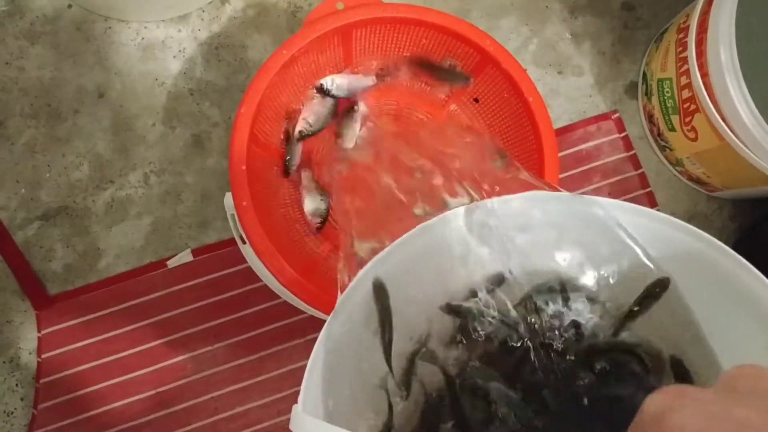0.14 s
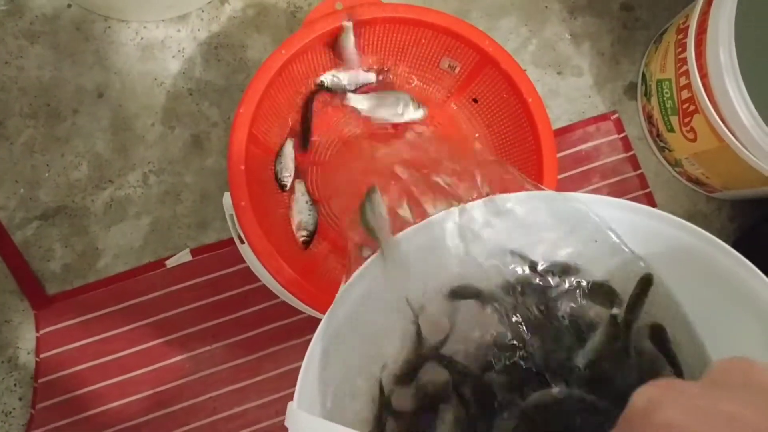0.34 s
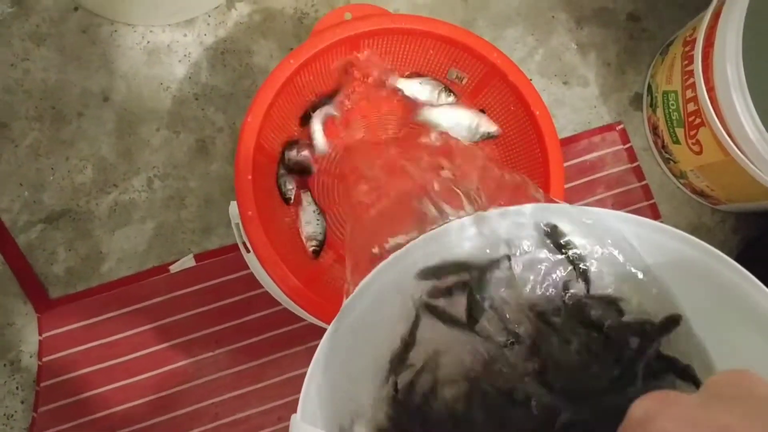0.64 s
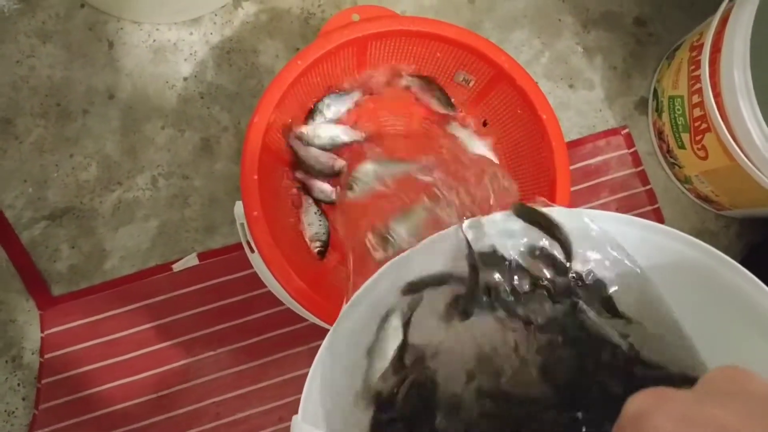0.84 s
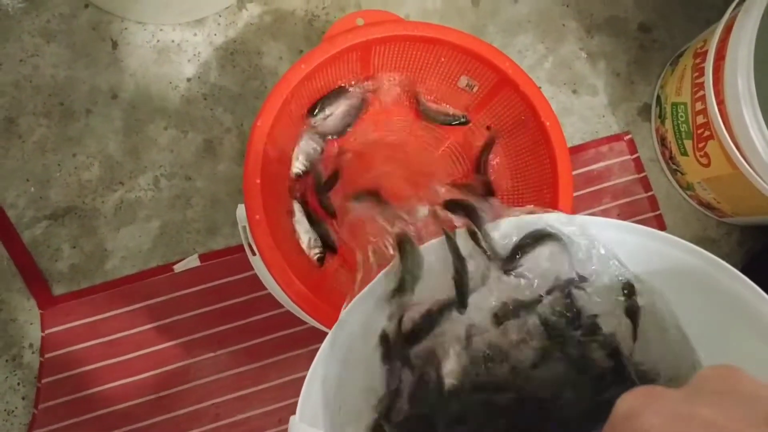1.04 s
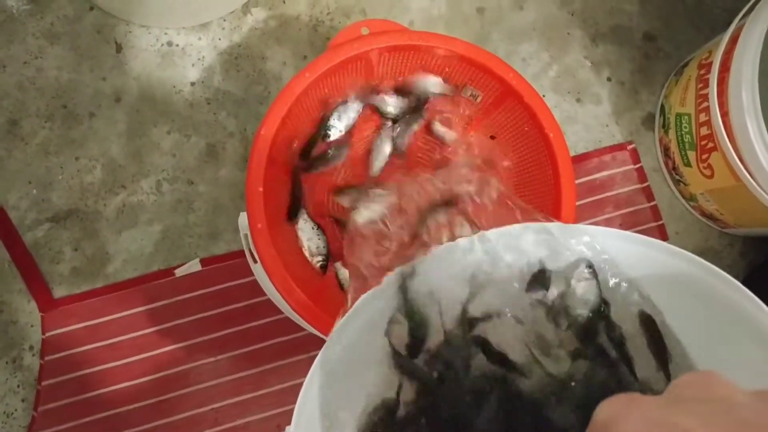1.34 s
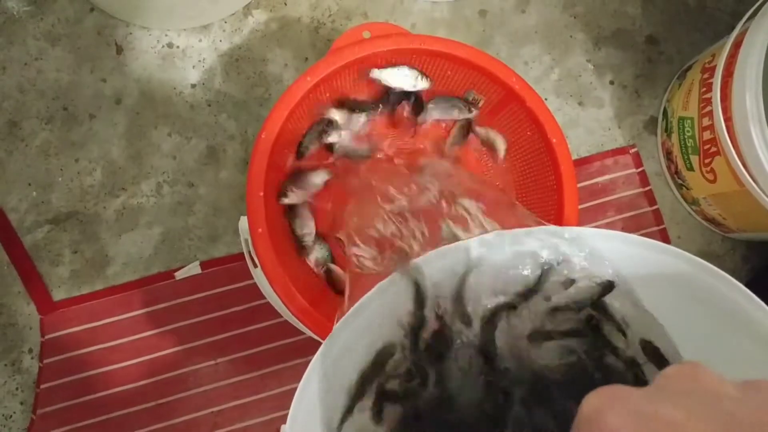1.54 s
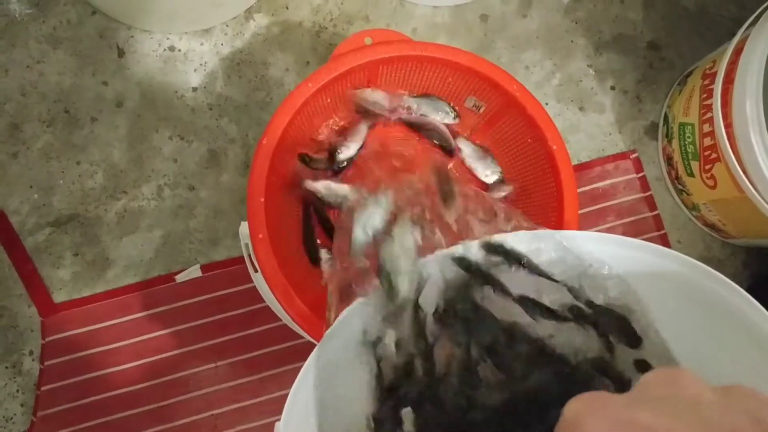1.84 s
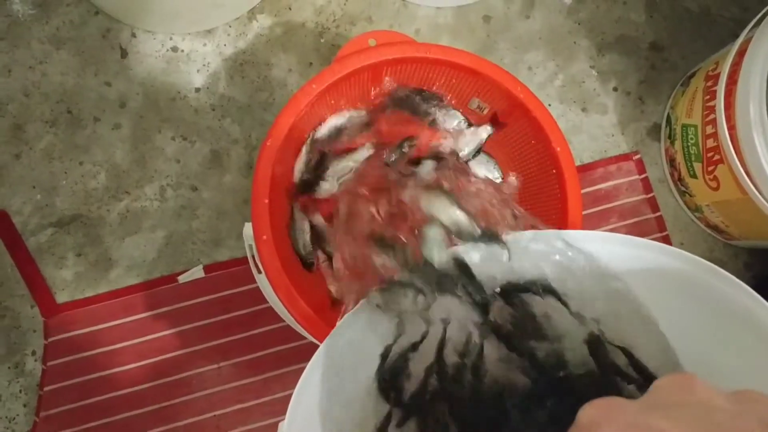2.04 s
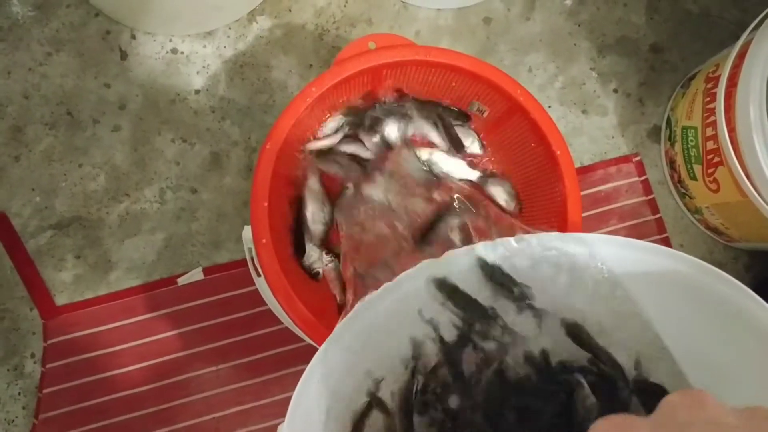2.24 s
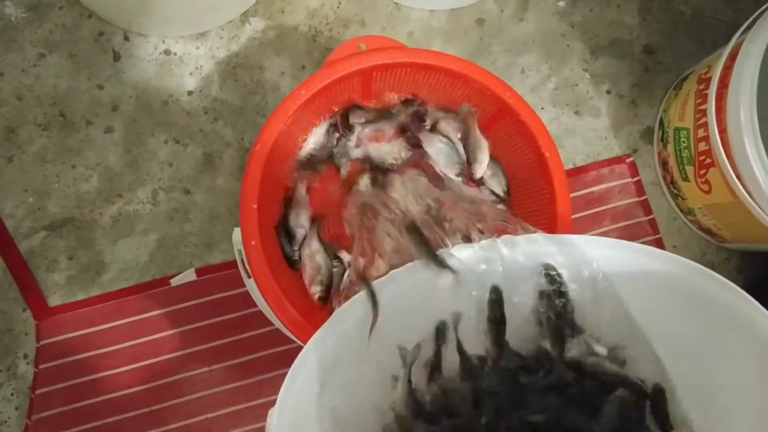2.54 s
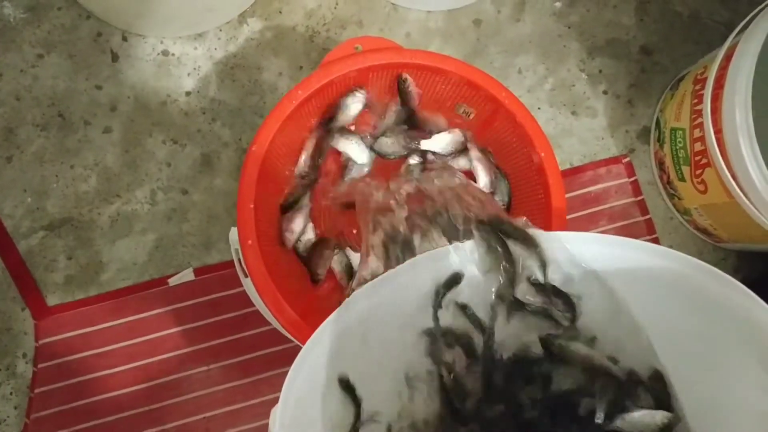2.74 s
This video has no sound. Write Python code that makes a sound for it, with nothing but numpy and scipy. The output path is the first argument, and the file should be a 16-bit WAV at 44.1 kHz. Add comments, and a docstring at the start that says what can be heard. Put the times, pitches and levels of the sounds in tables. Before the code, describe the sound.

Close, continuous pouring of water with fish into a mesh-covered bucket, with hollow drumming and bright spray

```python
"""A small hard room, close to a camera's microphone: water and small fish pour from a plastic bucket through
a colander into a second bucket. Noise rung by resonances makes the lower bucket drum under the stream, and
wavering tones swell as it booms under each heavy slug. Coloured noise and damped, gliding bubble tones make
the gurgle, slosh, splash and spray; single bubbles and small knots of them spit, noise bursts are fish
slapping the mesh, fluttering tones glug, and a faint low rumble lies underneath."""
import sys
import numpy as np
from scipy import signal
from scipy.fft import rfft, irfft, next_fast_len
from scipy.io import wavfile
from scipy.ndimage import uniform_filter1d, map_coordinates

SR = 44100
rng = np.random.default_rng(int(sys.argv[2]) if len(sys.argv) > 2 else 0)


def dump(signal):
    """Clip the signal to [-1, 1] and save it as 16-bit WAV at the path in sys.argv[1]."""
    limited = np.clip(np.atleast_2d(signal).T, -1, 1)
    pcm = np.round(limited * 32767).astype(np.int16)
    wavfile.write(sys.argv[1], SR, pcm)


N = 127890


def amp(db):
    """Decibels to amplitude."""
    return 10 ** (np.asarray(db) / 20)


def unit(x):
    """Scale to an rms of one."""
    return x / np.sqrt(np.mean(x ** 2) + 1e-20)


def along(points, hz):
    """Read a curve of (f/Hz, value) points on a log frequency axis."""
    f, value = np.transpose(points)
    return np.interp(np.log(hz + 1), np.log(f + 1), value)


def curves(rows):
    """One value per sample for each column after the time."""
    s, *columns = np.transpose(rows)
    return [np.interp(np.arange(N) / SR, s, column) for column in columns]


def wobble(rate):
    """A smooth random curve, rate knots a second, at most 60."""
    knots = rng.standard_normal(int(N * 60 / SR) + 4)
    return map_coordinates(knots, [np.arange(N) * min(rate, 60) / SR])


def filtered(x, response):
    """Multiply the spectrum of x by a complex response of frequency."""
    m = next_fast_len(N + SR // 2)
    return irfft(rfft(x, m) * response(np.fft.rfftfreq(m, 1 / SR)), m)[..., :N]


def coloured(x, spectrum):
    """Weight x by (f/Hz, relative level/dB) points."""
    return filtered(x, lambda hz: amp(along(spectrum, hz)))


def modes(table):
    """Causal response of damped resonances, neighbours of opposite sign."""
    def response(f):
        total = 0
        for k, (centre, width, db) in enumerate(table):
            total = total + (-1) ** k * amp(db) * 1j * f * width / (centre ** 2 - f ** 2 + 1j * f * width)
        return total
    return response


# How alike the two channels are: f/Hz, left-right correlation
CHANNEL_LIKENESS = [(30, .88), (100, 0.66), (200, 1), (400, 0.59), (700, 0.41), (1500, 0.22),
                    (4000, 0.0056)]


def pair(x):
    """Mix two unrelated signals to left and right, with a likeness that depends on frequency."""
    def mid_and_side(hz):
        turn = np.arccos(np.clip(along(CHANNEL_LIKENESS, hz), -1, 1)) / 2
        return np.array([np.cos(turn), np.sin(turn)])
    mid, side = filtered(x, mid_and_side)
    return np.array([mid + side, mid - side])


def rush(patchy_db):
    """Two turbulent noises with small and large patches of random gain in time and frequency."""
    z = signal.stft(rng.standard_normal((2, N)), nperseg=256)[2]

    def patches(high, long):
        grid = uniform_filter1d(rng.standard_normal(z.shape[1:]), high, 0)
        return unit(uniform_filter1d(grid, long, 1))

    gain = amp(patchy_db * (patches(5, 4) + patches(10, 20)))
    return unit(signal.istft(z * gain, nperseg=256)[1][:, :N])


def bubbles(s, hz, life_s, size, rise, length=400):
    """Bubbles ring as damped sines that glide upward, summed at their times."""
    t = np.arange(length) / SR
    u = t / life_s[:, None]
    envelope = size[:, None] * np.exp(-u) * (1 - np.exp(-8 * u))
    wave = envelope * np.sin(2 * np.pi * hz[:, None] * t * (1 + rise * u))
    at = (np.clip(s, 0, N / SR) * SR).astype(int)[:, None] + np.arange(length)
    return np.bincount(at.ravel(), wave.ravel(), N + length + 1)[:N]


def fizz(count, mid_hz, spread, cycles, size_db, size=300):
    """Random bubbles in clumps, a separate crowd on each side; size is the samples kept of each."""
    out, density = [], np.cumsum(amp(4.5 * wobble(40) + 2.5 * wobble(10)))
    for r in rng.random((2, 4, count)):
        s = np.interp(r[0] * density[-1], density, np.arange(N) / SR)
        hz = np.clip(mid_hz * np.exp(spread * 2 * (r[1] + r[2] - 1)), 200, SR / 3)
        loudness = amp(-size_db * np.log(r[3] + 0.0061))  # few loud, many faint
        out.append(bubbles(s, hz, cycles / hz, loudness, rise=0.053, length=size))
    return unit(np.array(out))


def layer(db, spectrum, grains, share, patchy_db):
    """Noise and bubbles under one colour and one level; share is the bubbles' part of the power."""
    share = np.clip(share, 0, 1)
    noise, grains = coloured(np.array([rush(patchy_db), grains]), spectrum)
    return amp(db) * (np.sqrt(1 - share) * unit(noise) + np.sqrt(share) * unit(grains))


# Steady drumming of the bucket, before offsets: t/s, level/dB
DRUM_LEVEL = [(0, -16.5), (.15, -25), (.4, -23), (.6, -24), (.9, -23), (1.25, -22), (1.6, -24),
              (2.05, -24.5), (2.3, -27), (2.6, -27), (2.8, -27), (2.9, -25.5)]
# Air and floor of the bucket: f/Hz, width/Hz, relative level/dB
BUCKET_MODES = [(177, 7.9, -8), (208, 15, -4.5), (224.8, 15.3, -2), (262.4, 11.4, -0.5), (297.6, 7.5, -1),
                (345, 19, -8), (388, 22, -13), (437.5, 17, -15)]


def drumming():
    """The stream drums steadily: noise rings the air and floor of the bucket."""
    level_db, = curves(DRUM_LEVEL)
    return amp(level_db - 1.5) * unit(filtered(rng.standard_normal((2, N)), modes(BUCKET_MODES)))


# Walls of the bucket: f/Hz, width/Hz, relative level/dB
WALL_MODES = [(510.4, 32, 2), (572.3, 24, 8), (622.4, 8.2, 9), (660, 13, 3), (721, 31, 7), (779, 54, 4.5),
              (817, 59, 6), (940, 65, 3), (1074, 54, -3), (1330, 45, -9)]
# Colour of the gurgle: f/Hz, relative level/dB
GURGLE_COLOUR = [(240, -54), (400, -15), (480, -3.5), (580, -2.5), (850, -1), (1200, -5), (1600, -4),
                 (2600, -33)]


def gurgle(level_db, surge):
    """Water gurgles in the bucket's walls: ringing noise and low bubbles."""
    low_bubbles = fizz(count=600, mid_hz=821, spread=0.3, cycles=5.3, size_db=4.0, size=600)
    ringing = unit(filtered(rush(patchy_db=-0.13), modes(WALL_MODES))) + 0.43 * low_bubbles
    db = level_db - 1.3 + 0.56 * surge + 0.53 * wobble(4.54)
    return layer(db, GURGLE_COLOUR, ringing, share=0.64, patchy_db=2.1)


# Colour of the slosh: f/Hz, relative level/dB
SLOSH_COLOUR = [(800, -42), (1200, -7), (1700, -2.5), (2400, -0.5), (3200, 2), (3800, -3), (5000, -49)]


def slosh(level_db, surge):
    """Mid-pitched rushing noise, with about a tenth of its power in short-lived bubbles."""
    grains = fizz(count=2500, mid_hz=2070, spread=0.48, cycles=1.5, size_db=3.5, size=250)
    return layer(level_db + 0.35 * surge, SLOSH_COLOUR, grains, share=0.095, patchy_db=1.33)


# Colour of the splash: f/Hz, relative level/dB
SPLASH_COLOUR = [(2500, -84), (3300, -4), (4100, 3), (5500, 1.5), (6500, -1.5), (7500, -9), (10000, -28)]


def splash(level_db, surge):
    """Bright patchy noise with small ringing bubbles."""
    grains = fizz(count=2500, mid_hz=5424, spread=0.405, cycles=8.65, size_db=2.5)
    return layer(level_db + 0.17 * surge, SPLASH_COLOUR, grains, share=0.27, patchy_db=1.3)


# Colour of the spray: f/Hz, relative level/dB
SPRAY_COLOUR = [(4500, -54), (6000, -6), (7200, -1), (11000, -3.5), (14000, -5.5), (15400, -9.5),
                (16200, -13)]


def spray(level_db, surge):
    """The mesh breaks the stream into a fizz: treble noise and the tiniest bubbles."""
    grains = fizz(count=3500, mid_hz=9240, spread=0.45, cycles=6.7, size_db=4.0, size=160)
    return layer(level_db + 0.76 + 0.17 * surge, SPRAY_COLOUR, grains, share=0.16, patchy_db=1.46)


# Course of the pour, before offsets: t/s, gurgle level/dB, slosh level/dB, splash level/dB, spray level/dB
POUR_LEVELS = [(0.0, -24.5, -28, -29.5, -26), (0.06, -30, -28.5, -26.5, -24),
               (0.14, -22, -28.5, -25, -25.5), (0.17, -30, -28, -23, -17), (0.21, -27.5, -29, -25, -24),
               (0.52, -30.5, -29.5, -25.5, -24.5), (0.77, -29.5, -28.5, -24, -23),
               (0.78, -30.5, -31, -27, -26.5), (0.84, -30.5, -26, -24, -22.5),
               (0.94, -25.5, -31, -26.5, -23.5), (0.99, -29, -28.5, -23.5, -22.5),
               (1.15, -29.5, -27.5, -25, -23.5), (1.2, -29.5, -30.5, -26, -23.5),
               (1.47, -31.5, -29.5, -24.5, -23), (1.54, -26, -29, -26.5, -23.5),
               (1.57, -33, -25, -20, -20.5), (1.58, -29, -27.5, -25, -23.5), (1.93, -29, -28, -24.5, -23.5),
               (2.01, -27.5, -26, -23, -20), (2.24, -30, -25.5, -24.5, -23), (2.26, -30, -25, -24, -20.5),
               (2.3, -28, -27, -23, -22), (2.41, -30, -24.5, -24, -23), (2.53, -31.5, -30.5, -26.5, -27),
               (2.61, -32, -29.5, -29, -25.5), (2.64, -33.5, -27, -20.5, -21.5),
               (2.71, -28.5, -30, -29.5, -29.5), (2.77, -28, -29.5, -24.5, -23), (2.85, -31, -30, -29, -25),
               (2.9, -34.5, -30, -24, -25)]


def stream():
    """The steady pour: drumming under four wet layers that share one random surge."""
    gurgle_db, slosh_db, splash_db, spray_db = curves(POUR_LEVELS)
    surge = wobble(8.32)
    wet = gurgle(gurgle_db, surge) + slosh(slosh_db, surge)
    wet = wet + splash(splash_db, surge) + spray(spray_db, surge)
    return pair(drumming() + amp(2.7) * wet)


def swell(s, db, rise, fall):
    """A bell-shaped gain, 6 dB down one rise before and one fall after its peak."""
    t = np.arange(N) / SR - s
    rise, fall = np.clip([rise, fall], .007, .03)  # seconds
    return amp(db - 6 * (t / np.where(t < 0, rise, fall)) ** 2)


# Surges that make the bucket boom: peak t/s, level/dB, f/Hz, rise over the last 6 dB/s, fall by 6 dB/s
# (rise and fall are times in seconds, which swell() limits)
BOOM_SURGES = [(0.091, -16.2, 246, 0.022, 0.023), (0.123, -16.6, 337, 0.006, 0.018),
               (0.135, -6.2, 241, 0.012, 0.014), (0.163, -11.7, 254, 0.011, 0.011),
               (0.181, -16.9, 320, 0.007, 0.005), (0.19, -23, 372, 0.012, 0.015),
               (0.203, -4.3, 239, 0.017, 0.014), (0.274, -11.1, 244, 0.016, 0.014),
               (0.317, -14.3, 249, 0.013, 0.014), (0.355, -13.1, 242, 0.013, 0.033),
               (0.433, -13.6, 254, 0.013, 0.02), (0.471, -9.6, 242, 0.011, 0.01),
               (0.538, -19, 345, 0.01, 0.012), (0.548, -7.4, 248, 0.024, 0.014),
               (0.574, -13.0, 262, 0.009, 0.009), (0.589, -14.6, 303, 0.011, 0.005),
               (0.592, -23, 378, 0.01, 0.012), (0.604, -10.0, 254, 0.014, 0.027),
               (0.646, -14.1, 260, 0.012, 0.01), (0.67, -8.1, 253, 0.011, 0.014),
               (0.694, -18.5, 312, 0.005, 0.006), (0.736, -10.0, 255, 0.029, 0.02),
               (0.801, -14.1, 258, 0.031, 0.03), (1.006, -16.7, 239, 0.009, 0.009),
               (1.033, -19.0, 292, 0.008, 0.021), (1.037, -16.8, 245, 0.01, 0.02),
               (1.069, -16.0, 249, 0.041, 0.032), (1.095, -18.9, 301, 0.007, 0.008),
               (1.11, -14.8, 247, 0.053, 0.036), (1.138, -16.8, 256, 0.018, 0.011),
               (1.209, -10.8, 319, 0.007, 0.006), (1.212, -17, 365, 0.007, 0.015),
               (1.227, -7.6, 235, 0.019, 0.01), (1.251, -14.3, 300, 0.005, 0.006),
               (1.27, -20, 350, 0.012, 0.012), (1.283, -10.8, 243, 0.012, 0.027),
               (1.29, -14.5, 319, 0.008, 0.009), (1.305, -20, 380, 0.014, 0.018),
               (1.332, -17.7, 295, 0.006, 0.021), (1.355, -16.3, 238, 0.008, 0.011),
               (1.406, -16.9, 252, 0.017, 0.019), (1.443, -17.2, 301, 0.008, 0.008),
               (1.47, -10.9, 246, 0.025, 0.013), (1.526, -14.1, 253, 0.013, 0.01),
               (1.553, -17.3, 244, 0.011, 0.025), (1.659, -15.6, 244, 0.016, 0.029),
               (1.712, -15.9, 244, 0.01, 0.032), (1.834, -14.5, 256, 0.022, 0.021),
               (1.867, -13.5, 247, 0.045, 0.026), (1.914, -15.5, 248, 0.012, 0.01),
               (1.946, -14.6, 248, 0.016, 0.02), (2.02, -14.0, 235, 0.04, 0.013),
               (2.032, -12.7, 302, 0.01, 0.041), (2.047, -9.7, 235, 0.011, 0.011),
               (2.099, -17.0, 234, 0.011, 0.008), (2.106, -13.9, 301, 0.033, 0.007),
               (2.155, -16.2, 303, 0.008, 0.024), (2.16, -12.2, 239, 0.018, 0.014),
               (2.231, -19.1, 294, 0.029, 0.01), (2.308, -19, 232, 0.01, 0.012),
               (2.312, -21, 298, 0.012, 0.012), (2.34, -27, 362, 0.015, 0.02),
               (2.39, -21, 236, 0.014, 0.014), (2.469, -17.8, 235, 0.012, 0.018),
               (2.556, -15.8, 234, 0.01, 0.012), (2.64, -21, 285, 0.015, 0.015),
               (2.772, -19, 246, 0.01, 0.01), (2.786, -18.6, 313, 0.008, 0.008),
               (2.822, -18.5, 300, 0.018, 0.025), (2.83, -21, 240, 0.015, 0.02)]
# Pitch borders between the three booming modes: f/Hz
BOOM_BORDERS = [275, 330]
SUSTAIN_DB = (-3.5, -16, -19)  # ringing of each mode between surges, over the drumming curve
WANDER_RAD = 0.52  # slow random drift of phase


def boom():
    """Three modes of the bucket keep ringing; each surge feeds one of them and bends its pitch."""
    out, (drum_db,) = 0, curves(DRUM_LEVEL)
    for mode, sustain_db in enumerate(SUSTAIN_DB):
        rows = [row for row in BOOM_SURGES if np.searchsorted(BOOM_BORDERS, row[2]) == mode]
        hz, = curves([(s, pitch) for s, db, pitch, rise, fall in rows])
        power = amp(drum_db + sustain_db) ** 2
        for s, db, pitch, rise, fall in rows:
            power = power + swell(s, db, rise, fall) ** 2
        cycles = np.cumsum(hz) / SR + rng.random()
        out = out + np.sqrt(power) * np.sin(2 * np.pi * cycles + WANDER_RAD * wobble(25.08))
    return out


# Colour of the low rumble: f/Hz, relative level/dB
RUMBLE_COLOUR = [(15, -8), (25, 1), (60, 0.5), (110, 7), (150, 15.5), (170, -13), (250, -60)]
RUMBLE_DB, FADE_DB_PER_S = -53.5, 2.5  # level at the start before its swings, steady fade
FOLLOW_SHARE = 0.62  # share of the scene's level swings, in dB, that the rumble follows


def rumble(heard):
    """A faint uneven low noise that eases off and swings with the loudness of everything else."""
    power = np.abs(uniform_filter1d(np.mean(heard, axis=0) ** 2, size=900))
    level = amp(RUMBLE_DB - FADE_DB_PER_S * np.arange(N) / SR + 1.9 * wobble(10.6))
    level = level * (power / power.mean()) ** (FOLLOW_SHARE / 2)
    return level * unit(pair(coloured(rng.standard_normal((2, N)), RUMBLE_COLOUR)))


# Spits at the mesh: t/s, relative level/dB, f/Hz, length/s, left over right level/dB before the final lean
SPIT_EVENTS = [(0.11, -8, 4350, 0.0025, -5.0), (0.1775, -14, 4020, 0.003, -2.5),
               (0.615, -8, 3400, 0.0025, -1), (0.677, -10.5, 3500, 0.013, -1),
               (0.817, -11, 3100, 0.0022, -4.0), (0.828, -8, 4200, 0.0027, -7),
               (0.862, -5, 5100, 0.0018, -16), (0.9787, -10, 6280, 0.0025, -3.5),
               (1, -2, 4840, 0.00252, -4.0), (1.053, -9.5, 3630, 0.0075, -8),
               (1.257, -11, 4050, 0.0018, -8), (1.381, -5, 3860, 0.0025, -2),
               (1.472, -2, 6050, 0.0017, -3.5), (1.5604, -8, 5420, 0.0025, -6),
               (1.5614, -3, 4100, 0.0022, -3.5), (1.77, -1, 5800, 0.0025, -2),
               (1.8517, -5, 4490, 0.0025, -1), (2.0278, -3, 5640, 0.0025, -5),
               (2.108, -11, 2900, 0.0019, -3.5), (2.376, -6, 4080, 0.0025, -7),
               (2.62, -18, 4860, 0.0025, -3.5), (2.642, -6.5, 4870, 0.016, 3),
               (2.737, -6, 4740, 0.0031, -10), (2.7666, -5, 5240, 0.0025, -5),
               (2.784, 3.5, 5320, 0.00184, -1), (2.746, -11, 4200, 0.0015, -3), (1.07, -9, 4200, 0.003, -3),
               (1.144, -11, 3460, 0.0066, -3), (1.266, -2.5, 5360, 0.003, -2), (2.666, -13, 5160, 0.016, 4),
               (2.633, -19, 3280, 0.015, 5), (2.642, -10, 7200, 0.0099, 1), (0.172, -10.5, 7370, 0.01, -15),
               (0.0473, -14, 7700, 0.0015, -2.5), (0.1521, -10, 12100, 0.0015, -3),
               (0.168, -8, 9000, 0.015, -1.0), (1.2575, -9, 6870, 0.0016, 2),
               (1.5903, 4, 9650, 0.0015, -1.0), (1.7923, -15, 9100, 0.0015, 1),
               (1.8507, 1, 7900, 0.0013, -10), (1.9999, 8, 10700, 0.0016, 3),
               (2.0817, -18, 7600, 0.0015, -0.5), (2.255, 2, 7500, 0.0028, -10),
               (2.3545, -2, 11800, 0.0015, -0.5), (2.4608, -5, 7300, 0.0015, -13),
               (2.4957, 5, 7200, 0.0016, -1.5), (2.6155, -11, 7760, 0.0015, -1.0),
               (2.7661, -13, 8690, 0.0015, 0.0), (2.816, 2, 9200, 0.0025, -10)]
SPIT_DB, SPIT_CYCLES = -3.5, 6.5  # offset to every spit; cycles in which a bubble decays to 1/e
SPIT_LOG_SPREAD = 0.112  # full width of the random spread of log pitch
SPIT_PER_S = 500  # bubbles a second within a spit, at least one


def spits():
    """Sharp spits: most a single damped bubble tone, the longer ones several bubbles near one pitch."""
    rows = np.array(SPIT_EVENTS)
    many = np.maximum(np.round(rows[:, 3] * SPIT_PER_S), 1).astype(int)
    s, db, hz, length, pan = np.repeat(rows, many, axis=0).T
    r = rng.random((len(s), 2))
    when = s + length * r[:, 0]
    pitch = hz * np.exp(SPIT_LOG_SPREAD * (r[:, 1] - .5))
    sides = []
    for side in (1, -1):  # left, right
        size = amp(db + SPIT_DB + side * pan / 2)
        sides.append(bubbles(when, pitch, SPIT_CYCLES / pitch, size, rise=0.019))
    return np.array(sides)


# Fish hitting the mesh: t/s, level/dB before the decay, decay to 1/e/s (a time in seconds)
FISH_SLAPS = [(0.119, -16, 0.018), (0.439, -21, 0.025), (0.687, -17.5, 0.011), (1.2, -15, 0.0087),
              (1.44, -19, 0.0056), (2.016, -16, 0.017), (2.146, -22.5, .008), (2.384, -39, 0.023)]
# Colour of a slap: f/Hz, relative level/dB
SLAP_COLOUR = [(120, -30), (200, 14), (300, -7), (550, 12), (950, 4.5), (1400, 1), (2500, -6), (5000, -32)]


def slaps():
    """Fish slap the mesh: bursts of coloured noise with a fast attack and exponential decay."""
    gain, t = np.zeros(N + SR), np.arange(SR // 5) / SR
    for s, db, decay in FISH_SLAPS:
        gain[round(s * SR):][:len(t)] += amp(db) * np.exp(-t / decay) * (1 - np.exp(-t / 0.0013))
    return gain[:N] * unit(coloured(rng.standard_normal(N), SLAP_COLOUR))


# Big bubbles: peak t/s, level/dB, f/Hz at the peak, rise and fall by 6 dB/s (a time, which swell() limits)
BIG_BUBBLES = [(.926, -26, 887, .008), (1.59, -23.5, 432, .016), (1.633, -22.5, 442, .014),
               (1.969, -27, 905, .008), (2.478, -28, 737, .008)]
GLUG_RISE_PER_S, FLUTTER_RAD = 2.5, .6  # upward glide as a share of pitch; random phase flutter


def glugs():
    """Big bubbles glug: short fluttering tones that glide upward."""
    t, flutter, out = np.arange(N) / SR, FLUTTER_RAD * wobble(60), 0
    for s, db, hz, rise in BIG_BUBBLES:
        cycles = hz * (t - s) * (1 + GLUG_RISE_PER_S * (t - s) / 2)
        out = out + swell(s, db, rise, rise) * np.sin(2 * np.pi * cycles + flutter)
    return out


ROOM_DB, ROOM_T60 = -12.5, 0.1  # tail level, seconds to fall by 60 dB


def room(x):
    """Hard walls answer with a short diffuse tail, different on each side."""
    t = np.arange(SR // 4) / SR
    tail = rng.standard_normal((2, len(t))) * amp(-60 * t / ROOM_T60)
    return signal.fftconvolve(x, tail / np.linalg.norm(tail[0]), axes=1)[:, :N]


# Balance of the two channels: f/Hz, left over right level/dB
STEREO_LEAN = [(60, -2), (110, -15), (200, -1), (380, -2.0), (700, -1.0), (1290, -1.5), (2380, -2),
               (4400, -4), (8120, -1.5), (15000, 2)]
LAG_S = .00006  # left behind right


def scene():
    """Pour, slugs, fish and spits near the microphone; the room answers all but the steady pour."""
    near = spits() + boom() + glugs() + slaps()
    dry = stream() + near + amp(ROOM_DB) * room(near)
    side = np.array([[.5], [-.5]])

    def lean_and_lag(hz):
        return amp(side * along(STEREO_LEAN, hz)) * np.exp(-2j * np.pi * hz * side * LAG_S)

    return filtered(dry, lean_and_lag)


LOW_CUT_HZ, TOP_HZ = 181, 15650


def record(dry):
    """The camera cuts the bass, rounds off the highest peaks and keeps nothing above its band limit."""
    thin = filtered(dry, lambda hz: 1 / np.sqrt(1 + (LOW_CUT_HZ / (hz + 1)) ** 9))
    thin = thin + rumble(thin)  # added after the bass cut
    soft = thin / (1 + np.abs(thin / .97) ** 8) ** (1 / 8)
    return filtered(soft, lambda hz: hz < TOP_HZ)


dry = scene()
out = record(dry)
dump(out)
```